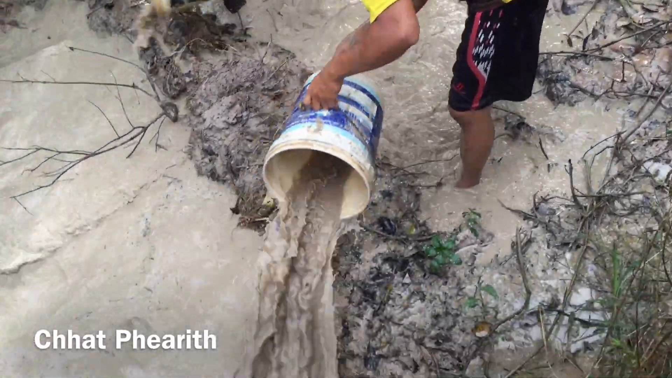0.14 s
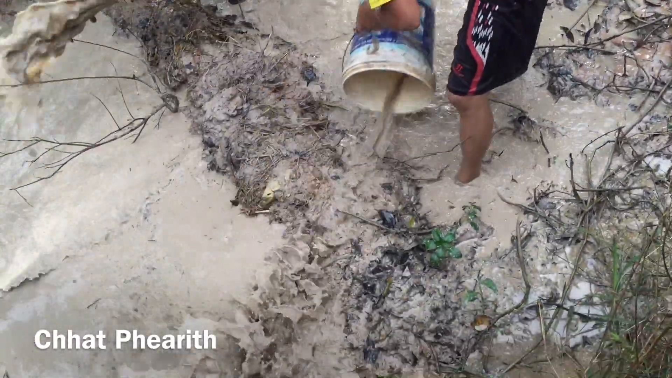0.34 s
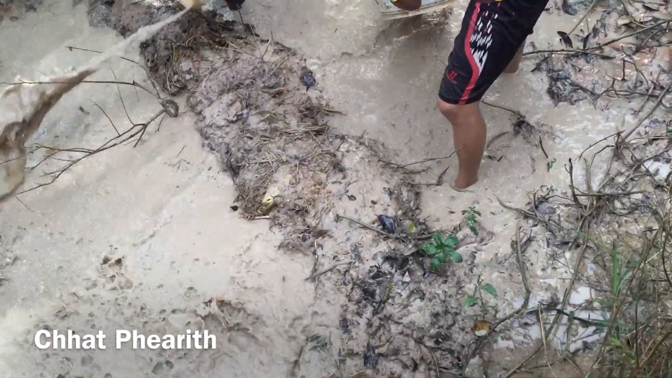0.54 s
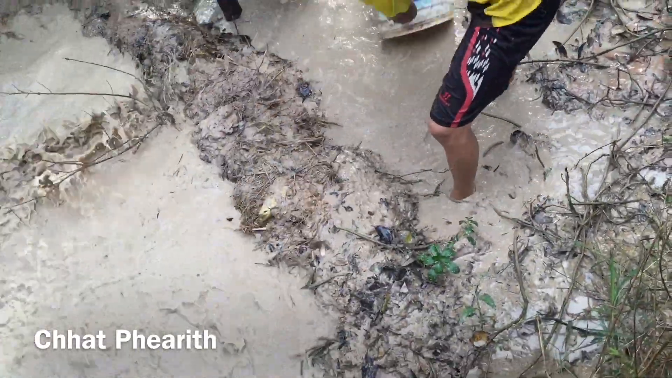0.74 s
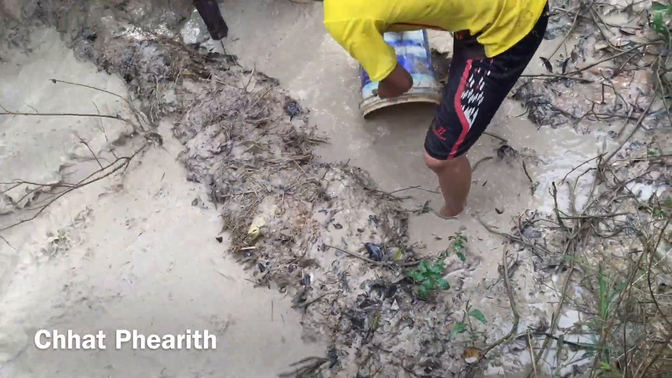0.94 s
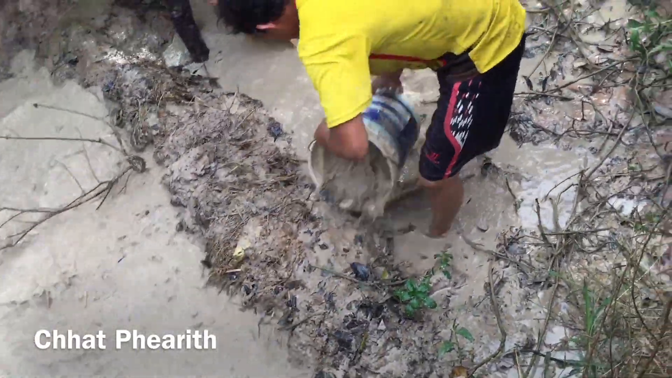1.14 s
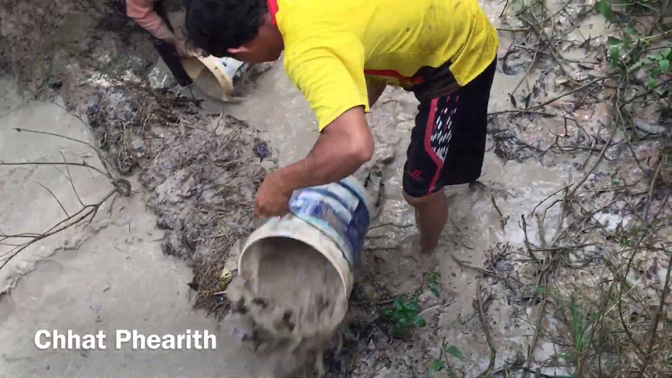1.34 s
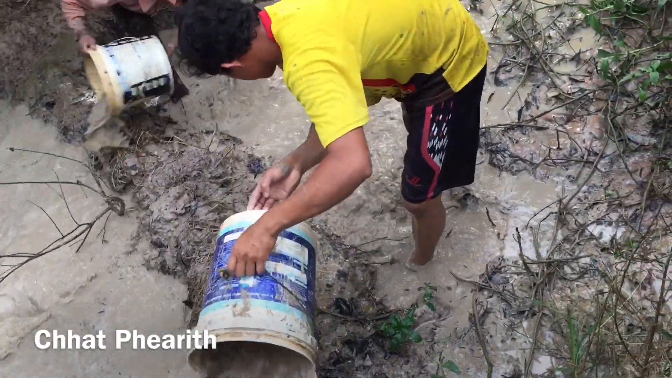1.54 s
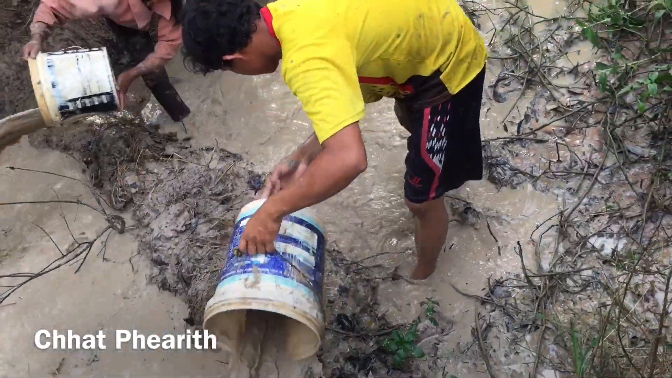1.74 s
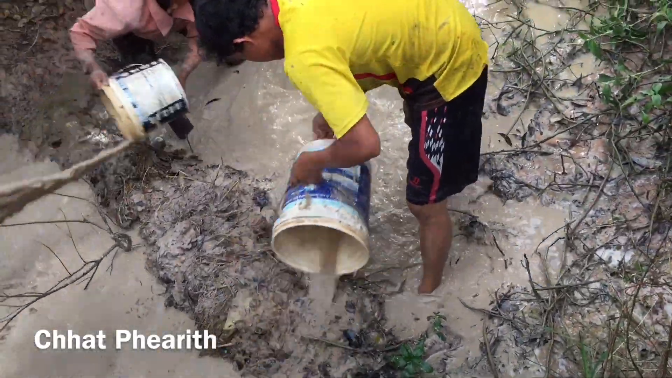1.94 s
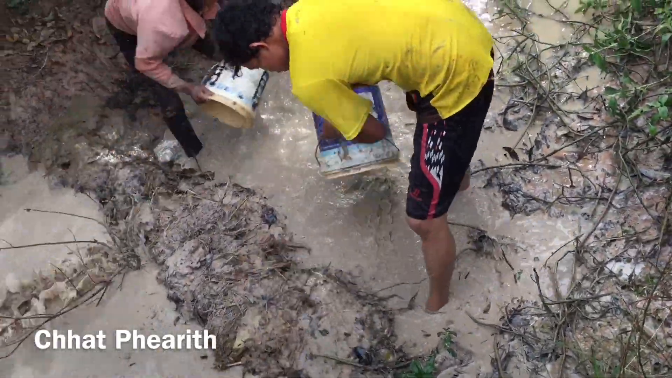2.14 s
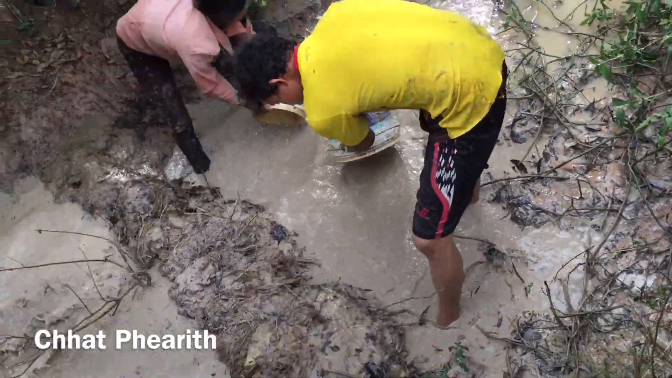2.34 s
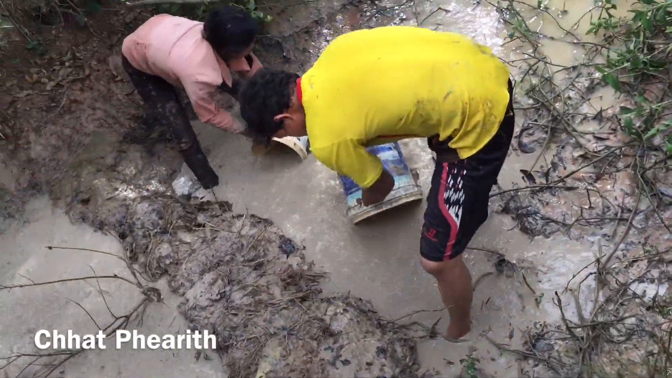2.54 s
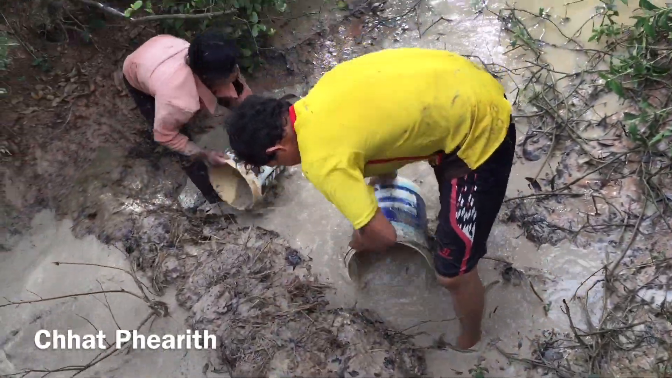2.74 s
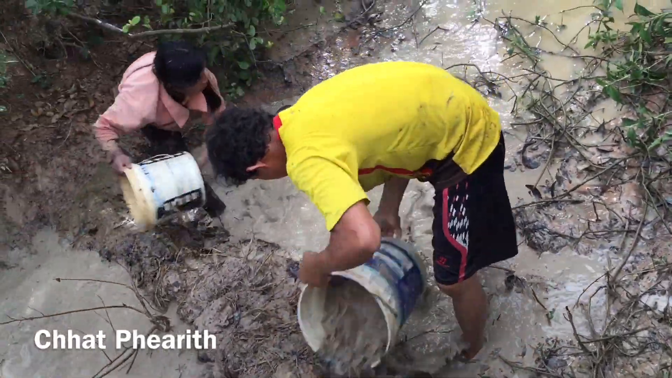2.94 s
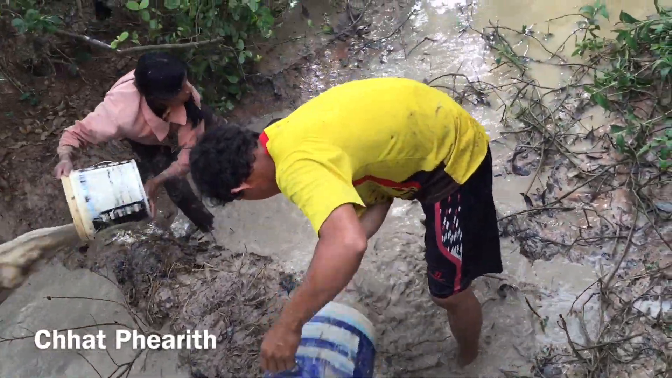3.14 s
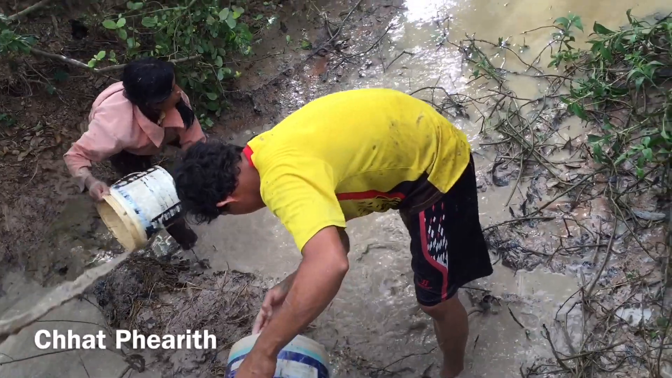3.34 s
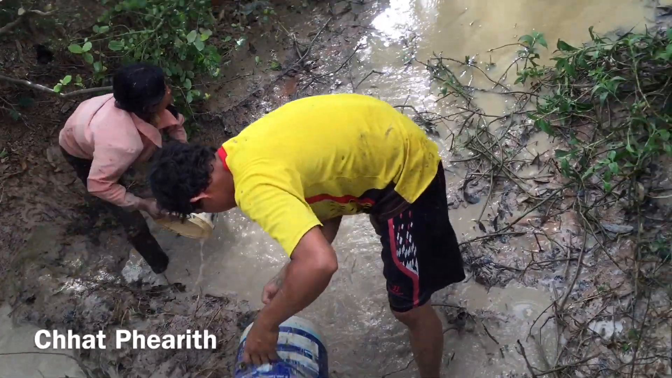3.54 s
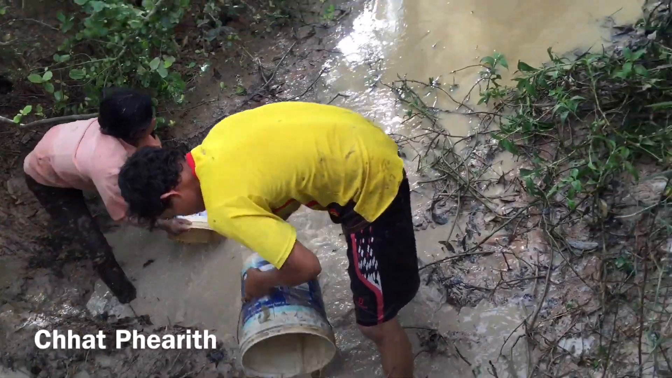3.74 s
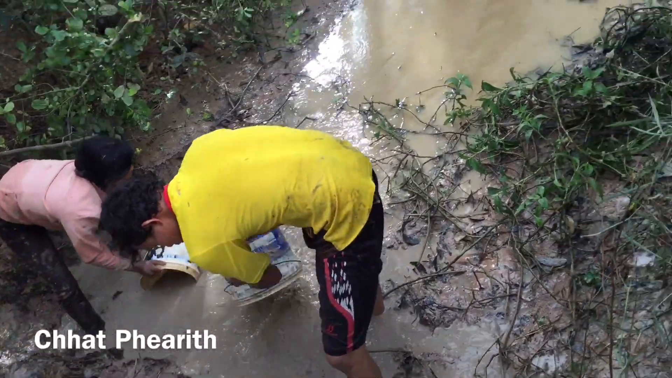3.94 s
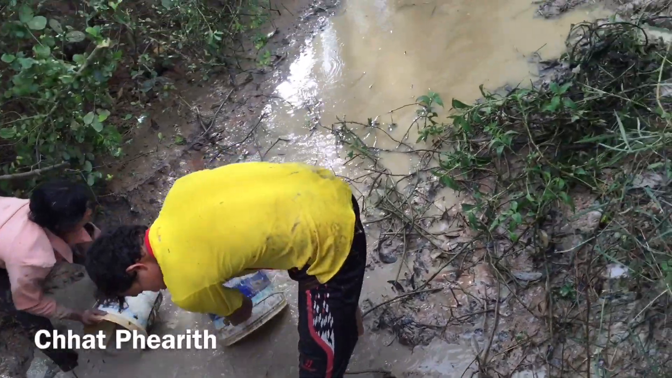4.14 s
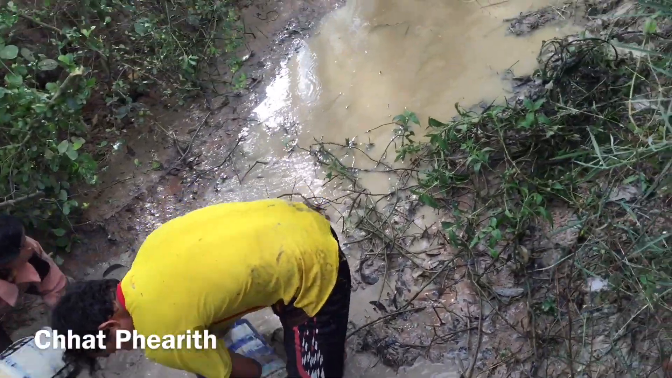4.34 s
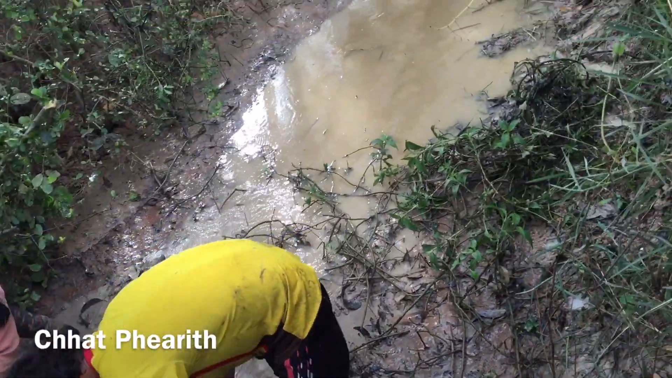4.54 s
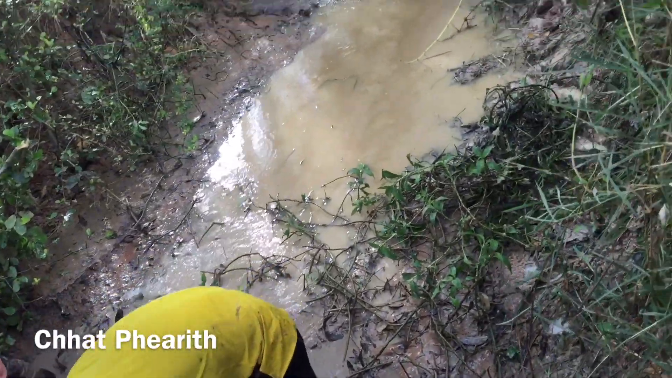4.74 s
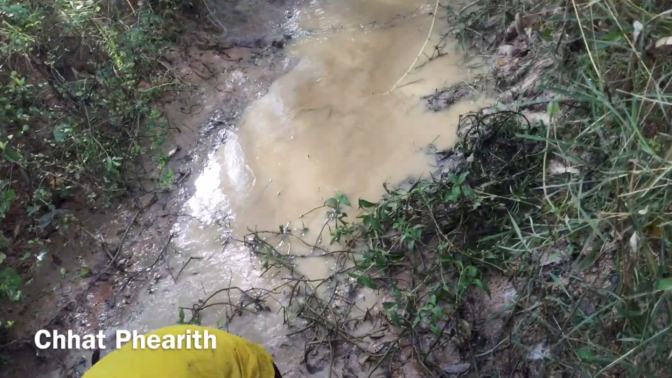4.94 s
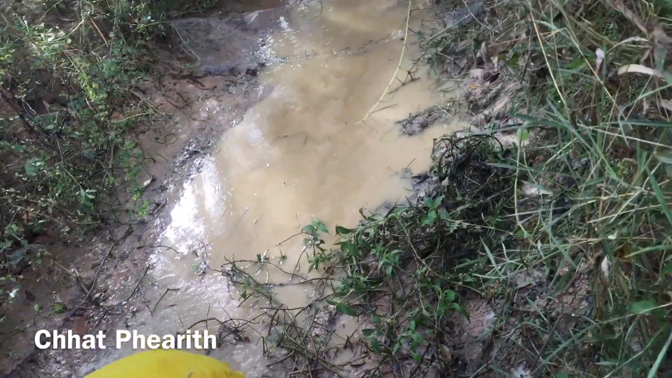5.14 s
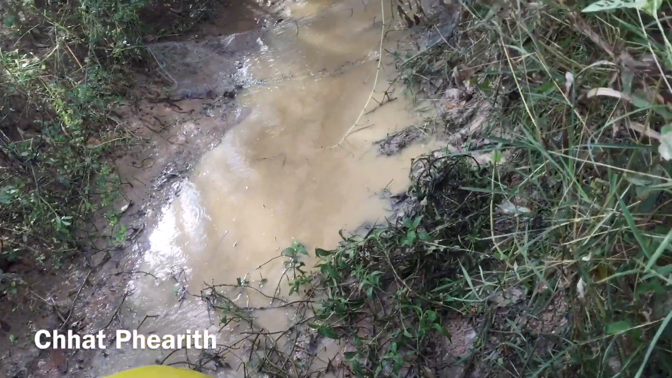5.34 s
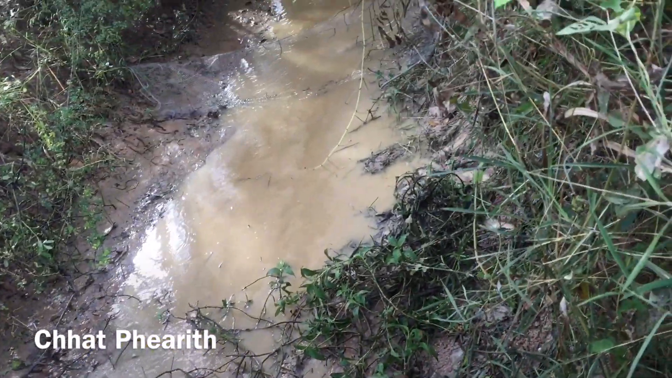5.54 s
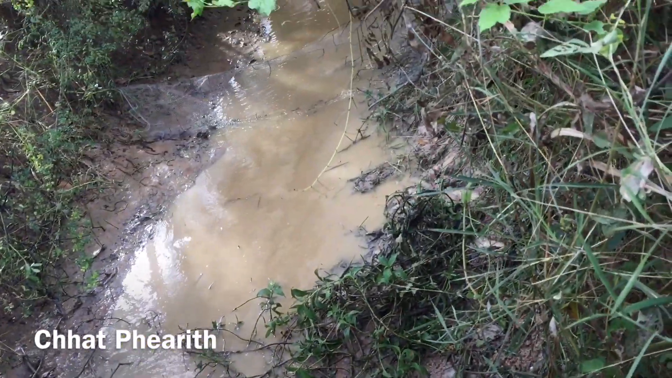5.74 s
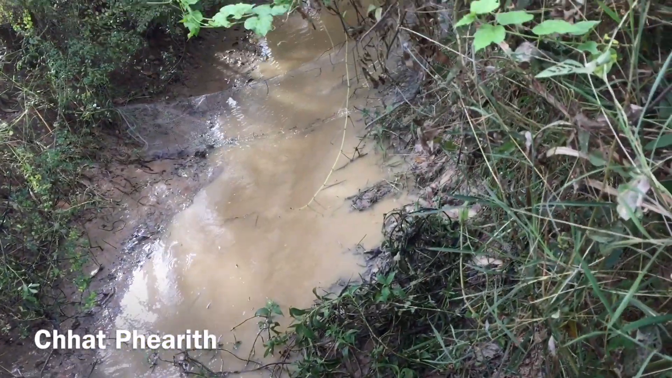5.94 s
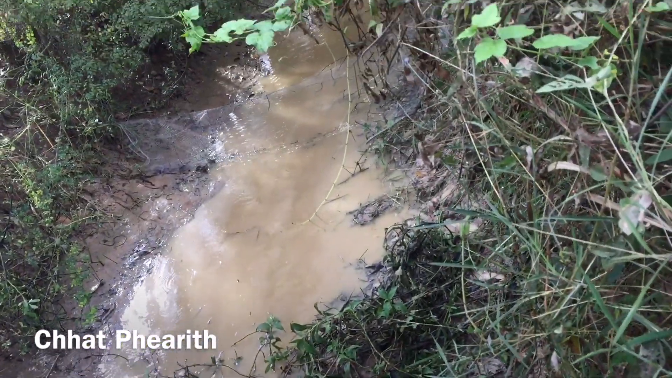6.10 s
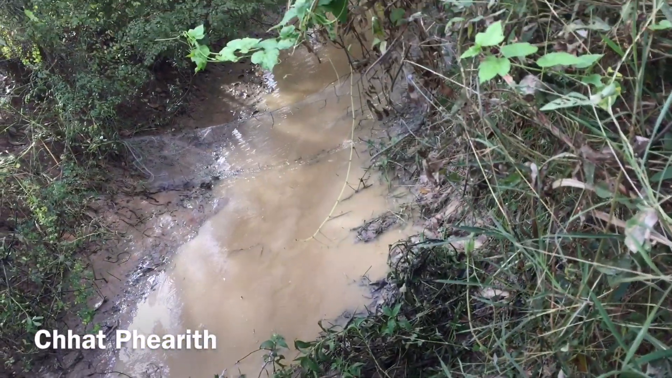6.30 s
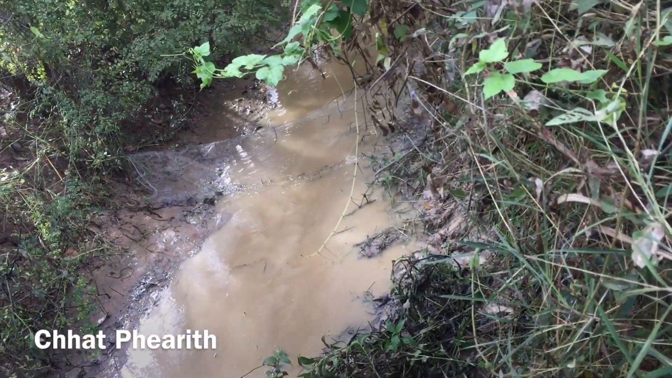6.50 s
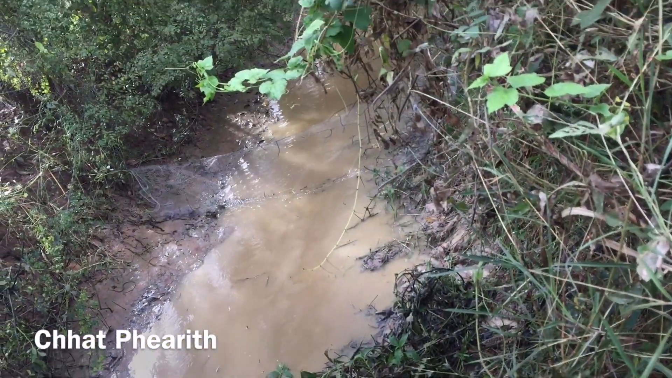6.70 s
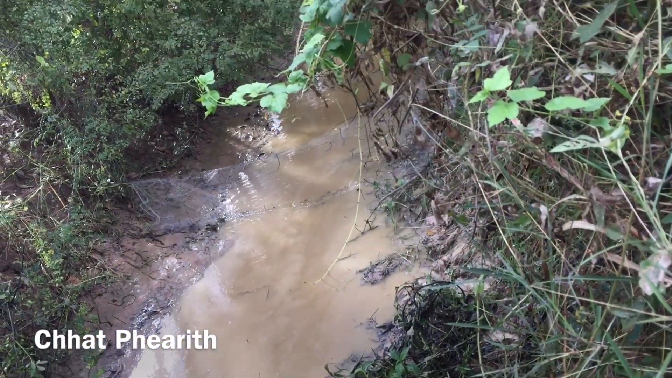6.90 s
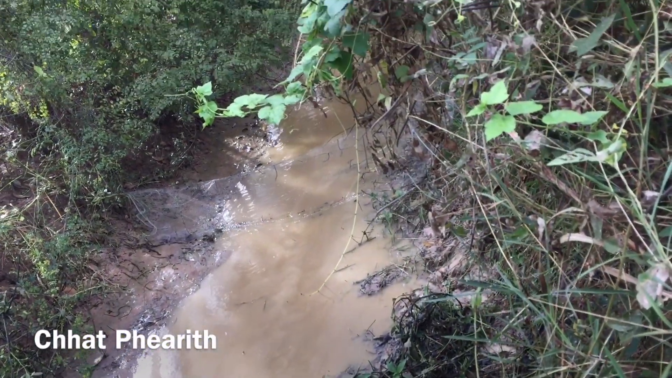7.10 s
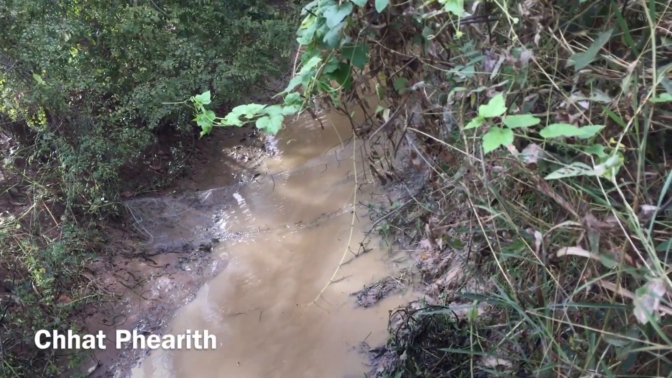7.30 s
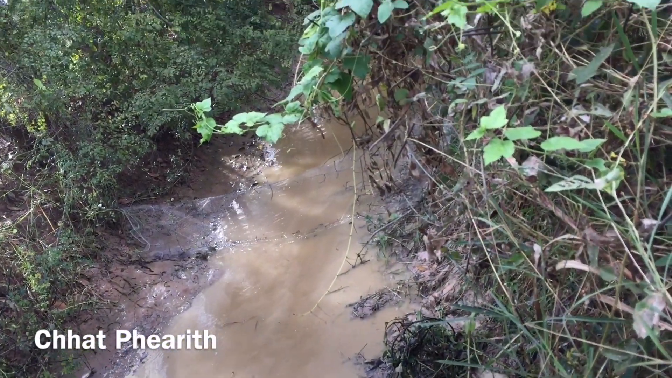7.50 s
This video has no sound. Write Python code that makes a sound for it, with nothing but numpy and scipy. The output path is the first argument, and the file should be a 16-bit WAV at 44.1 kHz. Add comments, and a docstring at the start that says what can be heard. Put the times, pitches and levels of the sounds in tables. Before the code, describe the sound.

Right at the start, a big bucket of muddy water empties over a bank, close by: a wet smack, a soft thud, churning bubbles, then spray thinning to a trickle. The same heavy pour returns at about 1.7, 3.4 and 5.1 seconds. A smaller bucket flings lighter splashes at about 0.7, 2.1 and 3.6 seconds, and more water patters down around 5.5. Between pours, buckets scoop and legs wade, making uneven sloshes, short slaps and hollow gulps of trapped air. Around 6 seconds the water grows quiet, then a last sharp splash lands at 6.5. From there until about 7.5 seconds the ditch settles in small laps, drips and plinks. The place is outdoors, with a very short echo from nearby mud walls and a faint, wavering low drone far away throughout.

```python
"""Two people bail a muddy ditch with plastic buckets. At once the big bucket goes over the bank: a smack,
a thud, large bubbles churning, then spray that thins to a trickle. It pours three more times, about
every 1.7 s; in between, scoops slosh and gulp air and the small bucket flings its water. A last throw
lands at 6.5 s and the ditch settles in small laps and plinks. Throughout, close mud walls answer
briefly over a faint, far drone."""
import sys
import numpy as np
from scipy import signal
from scipy.fft import rfft, irfft, next_fast_len
from scipy.io import wavfile
from scipy.ndimage import map_coordinates

SR = 44100
rng = np.random.default_rng(int(sys.argv[2]) if len(sys.argv) > 2 else 0)


def waveform_to_disk(signal):
    """Save audio, clipped to [-1, 1], as 16-bit WAV at the path in sys.argv[1]."""
    frames = np.transpose(np.atleast_2d(signal))
    scaled = np.clip(frames, -1, 1) * 32767
    samples = np.round(scaled).astype(np.int16)
    wavfile.write(sys.argv[1], SR, samples)


N = 337806

# Levels in the tables are faders ahead of each layer's own trim; mist is set relative to the spray.
# The big bucket empties over the bank. Each row: first water in seconds, landing of the main mass
# in seconds, spray level in dB, churn level in dB, fade of the spray in dB per second.
POURS = [(0.07, .15, -31, -33, 22), (1.638, 1.79, -30.5, -32.5, 26.5), (3.4, 3.486, -30.5, -32.5, 31),
         (5.035, 5.16, -32, -32, 31)]
# Flung water comes down, mostly from the small bucket. Each row: heaviest moment in seconds,
# build-up in seconds, spray level in dB, churn level in dB, mist in dB.
THROWS = [(0.718, 0.054, -28.5, -34, -8), (2.137, 0.038, -29.5, -42, -4.5), (2.203, 0.1, -34.5, -33, -6),
          (3.579, 0.023, -26.5, -31.5, -7), (3.791, 0.16, -37.5, -37, -6), (5.545, 0.24, -37, -36.5, -7.5),
          (6.543, 0.011, -29, -36.5, -7)]
# Buckets scoop, legs wade, the ditch settles. Each row: start in seconds, length in seconds,
# spray level in dB, churn level in dB, mist in dB.
SLOSHES = [(-.02, .09, -48.5, -50.5, -3.5), (0.581, 0.017, -35, -54, -1.5), (0.785, 0.3, -46, -43.5, -9),
           (0.915, 0.17, -44.5, -45, -4), (1.106, 0.23, -42, -44.5, -6), (1.372, 0.11, -44, -47.5, -12.5),
           (1.487, 0.094, -45, -48, -3.5), (2.302, 0.12, -44, -50.5, -9.5), (2.499, 0.023, -45, -45, -4),
           (2.596, 0.11, -45.5, -51, -7), (2.676, 0.071, -42, -41.5, -6), (2.793, 0.18, -42.5, -46.5, -7.5),
           (2.913, 0.2, -43.5, -52, -7), (3.148, 0.08, -49.5, -49.5, -8.5),
           (3.289, 0.023, -47.5, -48, -12.5), (4.033, 0.035, -68, -48, -11), (4.158, 0.18, -48, -50, -12),
           (4.379, 0.12, -43, -42, -6), (4.494, 0.12, -42.5, -42.5, -9), (4.626, 0.21, -48, -54.5, -4.5),
           (4.848, 0.073, -49.5, -49, -9.5), (4.977, 0.068, -47, -55, 1.5), (5.738, .12, -45.5, -53, -7.5),
           (5.898, 0.029, -47.5, -55, -26), (6.05, 0.047, -54, -65, -29), (6.163, 0.32, -64.5, -85, -18),
           (6.379, .09, -57.5, -77, -1), (6.465, 0.019, -44.5, -69, 2), (6.547, 0.13, -47, -47, -11.5),
           (6.69, 0.22, -49, -66, -8.5), (6.964, 0.0083, -50.5, -58, -4.5), (7.054, 0.29, -61, -61, -13),
           (7.307, 0.097, -53.5, -62.5, -13), (7.428, 0.033, -57, -61.5, -9)]
# The largest air pockets trapped by a bucket or by falling water. Each row: start in seconds,
# peak level in dB, starting pitch in Hz, time to fall 60 dB in seconds.
GULPS = [(.101, -21, 310, 0.016), (.138, -22, 205, 0.056), (.149, -15, 330, 0.046), (.146, -15, 676, 0.015),
         (.166, -24, 272, 0.046), (.177, -27.5, 165, 0.065), (.2, -26.5, 850, .028), (.284, -26, 677, .022),
         (.716, -25.5, 850, 0.026), (.982, -16, 195, 0.08), (1.007, -33, 1600, 0.031),
         (1.037, -33, 780, .054), (1.752, -17.5, 290, 0.027), (1.777, -22, 287, 0.045),
         (1.799, -25.5, 190, 0.017), (1.847, -24, 660, 0.039), (2.131, -30, 344, .04),
         (2.27, -40, 344, 0.09), (2.606, -41, 589, 0.11), (2.678, -24.5, 293, 0.023),
         (2.695, -35, 197, .08), (2.728, -29.5, 169, 0.019), (3.478, -18, 737, 0.025),
         (3.487, -22.5, 314, 0.056), (3.575, -16, 650, 0.013), (4.198, -29, 837, 0.024),
         (4.406, -31, 194, 0.097), (4.414, -33, 128, .078), (4.43, -37, 737, 0.13), (4.504, -34, 286, .12),
         (5.163, -26.5, 293, 0.051), (6.187, -53.5, 1066, 0.069), (6.361, -48.5, 570, .035),
         (6.536, -32, 280, 0.031), (6.584, -29.5, 863, .029), (6.897, -47, 255, 0.058),
         (6.989, -45, 1720, .035), (7.099, -45.5, 1650, .028), (7.317, -40, 1630, .04),
         (7.327, -43, 341, 0.13), (7.386, -42.5, 332, 0.074), (7.483, -45, 1470, 0.058),
         (7.48, -58.5, 318, 0.44)]
# The loudest slaps of water and wet mud. Each row: start in seconds, level in dB,
# centre frequency in Hz, time to fall 60 dB in seconds.
SLAPS = [(.123, -20, 3230, 0.027), (.325, -23, 2040, .009), (.342, -30, 8100, .01), (.612, -27, 3000, .07),
         (.716, -23, 2540, .033), (.962, -26, 2000, 0.019), (1.007, -24.5, 2000, .022),
         (1.038, -29.5, 1900, .09), (1.413, -32, 2060, 0.027), (1.455, -32, 3400, 0.01),
         (1.554, -28.5, 2080, 0.019), (1.684, -27.5, 2320, .1), (1.749, -21, 1850, 0.12),
         (2.163, -24, 2500, 0.029), (2.604, -35, 1210, 0.03), (2.677, -26, 2580, .035),
         (2.806, -32.5, 1760, 0.017), (3.005, -26, 2430, 0.019), (3.244, -34, 1450, .02),
         (3.478, -19, 735, .03), (3.488, -23, 3000, .05), (3.58, -26, 2930, 0.014), (4.193, -34, 1060, 0.1),
         (4.222, -36, 2500, 0.026), (4.3, -37.5, 1800, 0.022), (4.414, -32.5, 1300, 0.063),
         (4.456, -28, 5380, 0.008), (4.539, -30, 1600, 0.03), (4.711, -30.5, 2900, 0.011),
         (4.928, -34.5, 1670, 0.048), (5.065, -23.5, 2860, .05), (5.112, -21, 1520, .045),
         (5.185, -25.5, 1460, 0.025), (5.3, -24, 2170, .012), (5.925, -35, 1410, 0.061),
         (5.938, -38.5, 1960, 0.061), (6.407, -37.5, 3020, 0.039), (6.485, -26, 2740, .02),
         (6.494, -29, 1330, 0.025), (6.534, -20.5, 1110, 0.035), (6.541, -20.5, 2440, 0.028),
         (6.541, -29.5, 7360, .039), (6.593, -23.5, 2380, 0.031), (6.773, -36.5, 1370, 0.046),
         (6.985, -38, 1090, 0.022), (7.079, -46, 900, 0.05), (7.126, -45.5, 2530, 0.019),
         (7.333, -44, 1000, 0.11), (7.325, -43, 1790, .12), (7.448, -49.5, 3160, 0.036)]
# Tone curves for the spray, the large bubbles and the drone. Each row: frequency in Hz, gain in dB.
SPRAY_EQ = [(530, -9.5), (900, -0.5), (1110, -1), (2040, 3.5), (2390, 0.5), (3000, 1.5), (4360, -3),
            (4960, -10.5), (5470, -8.5), (6790, -12.5), (9500, -16), (12400, -110.5)]
CHURN_EQ = [(70, -25), (130, -6), (200, -5), (330, 0), (420, 0), (510, -2), (660, 2), (850, -1.5),
            (1080, -12.5), (1500, -1.5), (2500, -52)]
DRONE_EQ = [(20, -15), (30, -7.5), (40, -32.5), (58, 1.5), (70, 5.5), (86, -0.5), (110, -6.5), (138, 2.5),
            (175, -17.5), (260, -29.5), (600, -48), (2500, -33), (9500, -47)]
# The tone curve of the trickle. Each row: frequency in Hz, gain in dB.
TRICKLE_EQ = [(700, 4.5), (2100, 3.5), (4200, -1.5)]
# The tail of the mud walls. Each row: frequency in Hz, time to fall 60 dB in seconds.
WALL_DECAY = [(150, 0.13), (1000, 0.22), (9000, 0.1)]

DB_PER_NEPER = 20 / np.log(10)


def pours(break_s=0.0088, mass_s=0.088, fresh_s=0.06):
    """Each pour breaks in, swells until the main mass lands, then drains: churn, spray, mist in dB."""
    t = np.arange(N) / SR
    for first, lands, spray_db, churn_db, drain in POURS:
        age = np.maximum(t - first, 0)
        opening_db = -DB_PER_NEPER * np.logaddexp(0, (first - t) / break_s)
        lead = np.clip((lands - t) / (lands - first), 0, 1)  # the first water is the weaker
        mass = np.exp(-((t - lands) / mass_s) ** 2)
        drained_db = drain * np.maximum(t - lands, 0)
        yield (churn_db + opening_db - 11 * lead + 4 * mass - 1.33 * drained_db,  # big bubbles die first
               spray_db + opening_db - 3 * lead + 0.5 * mass - drained_db,
               -7 + 3.5 * np.exp(-age / fresh_s))  # a fresh sheet of water breaks up finer


def throws(fall_s=0.035):
    """Flung water builds as its arc comes down, then stops short: churn, spray, mist in dB."""
    t = np.arange(N) / SR
    for peak, build_s, spray_db, churn_db, mist_db in THROWS:
        shape_db = DB_PER_NEPER * np.minimum((t - peak) / build_s, (peak - t) / fall_s)
        yield churn_db + shape_db, spray_db + shape_db, mist_db


def sloshes(rise_s=0.027, sag_db_per_s=9, fall_s=0.051):
    """A slosh rises fast, sags in uneven wavelets and settles: churn, spray, mist in dB."""
    t = np.arange(N) / SR
    wavelets_db = 1.35 * wobble(45)
    for start, length, spray_db, churn_db, mist_db in SLOSHES:
        age = np.maximum(t - start, 0)
        rise_db = 20 * np.log10(np.minimum(age / rise_s, 1) + 1e-6)
        settling_db = DB_PER_NEPER * np.maximum(age - length, 0) / fall_s
        shape_db = rise_db + wavelets_db - sag_db_per_s * age - settling_db
        yield churn_db + shape_db, spray_db + shape_db, mist_db


def water_levels(seep_db=-76.5, seep_mist_db=-5.5):
    """All moving water adds in power over the bank's steady seep: churn, spray, mist envelopes in dB."""
    power = lambda db: amp(np.maximum(db, -200)) ** 2
    low, high, fine = power(seep_db), power(seep_db), power(seep_db + seep_mist_db)
    for source in (pours, throws, sloshes):
        for churn_db, spray_db, mist_db in source():
            low += power(churn_db)
            high += power(spray_db)
            fine += power(spray_db + mist_db)
    return 10 * np.log10([low, high, fine / high])


def churn(level_db):
    """Falling water folds in air: large bubbles over a dull rush, in lumps."""
    cloud = bubbles(count=4500, lo_hz=151, hi_hz=1149, cycles=16.1, spread_db=0.5, rise=0.11)
    rush = amp(-0.5) * rng.standard_normal(N)
    body = unit(equalised(cloud + rush, CHURN_EQ))
    choke_db = 0.13 * np.maximum(level_db + 28.5, 0)  # the heaviest fall loses air to a few big gulps
    return amp(level_db - 3 - choke_db + 1.7 * wobble(45)) * body


def spray(level_db, mist_db, crossover_hz=4800):
    """Drops burst on mud and water; the finest ones make the mist on top."""
    drops = bubbles(count=24000, lo_hz=865, hi_hz=9170, cycles=5.3, spread_db=-1.5, rise=0.1)
    fizz = bubbles(count=6000, lo_hz=896, hi_hz=6920, cycles=61, spread_db=3.5, rise=0.42)
    cloud = equalised(drops + amp(-5) * fizz + rng.standard_normal(N), SPRAY_EQ)
    coarse = filtered(cloud, lambda hz: 1 / (1 + (hz / crossover_hz) ** 12))
    mist = amp(mist_db) * unit(cloud - coarse)
    clump_db = np.interp(level_db, [-52, -32], [1.5, 0.7])  # a dribble is clumpy, a gush runs together
    return amp(level_db - 3 + clump_db * wobble(110)) * (unit(coarse) + mist)


def gulps(swell_cycles=0.96, glide=0.096, flutter_db=2.5):
    """A trapped air pocket swells, rings and glides up as it dies, while its wall flutters."""
    track, t = np.zeros(N), np.arange(SR // 3) / SR
    for start, db, hz, t60 in GULPS:
        shape = (1 - np.exp(-(t * hz / swell_cycles) ** 2)) * decay(t, t60)
        tone = np.sin(2 * np.pi * hz * t * (1 + glide * t / t60))
        add(track, start, amp(db) * shape / shape.max() * tone)
    return track * amp(flutter_db * wobble(160))


def impacts(spray_db, lap_count=60, lap_ceiling_db=-27):
    """The slap cues, as in SLAPS: the loud hits, each pour's smack and thud, and small chance laps."""
    smacks = [(first, -30, 3700, 0.053) for first, *_ in POURS]  # the first water meets the mud
    thuds = [(lands, -30, 143, 0.18) for _, lands, *_ in POURS]  # the mass hits the ground
    laps = []
    for when, size, pitch in rng.random((lap_count, 3)):
        db = min(spray_db[int(when * N)], lap_ceiling_db) - 1.5 + 6 * (2 * size - 1)
        laps.append((when * N / SR, db, 1900 * 2 ** (2 * pitch - 1), 0.09))
    return SLAPS + smacks + thuds + laps


def slaps(cues, width=0.96, attack_s=0.0015, trim_db=-7):
    """A sheet of water hits flat: a short burst in the broad resonance of the hollow it makes."""
    track, t = np.zeros(N), np.arange(SR // 4) / SR
    for start, db, centre, t60 in cues:
        damping = lambda hz: 1j * hz * centre * width
        hollow = lambda hz: (damping(hz) / (centre ** 2 - hz ** 2 + damping(hz))) ** 2
        burst = unit(filtered(rng.standard_normal(len(t)), hollow))
        shape = (1 - np.exp(-t / attack_s)) * decay(t, t60)
        add(track, start, amp(db + trim_db) * burst * shape / shape.max())
    return track


def trickle(spray_db):
    """Small plinks of water running back; they fade more slowly than the spray, so they come forward."""
    plinks = bubbles(count=1100, lo_hz=750, hi_hz=4000, cycles=44, spread_db=2.7, rise=0.1)
    return amp(0.69 * spray_db - 24) * unit(equalised(plinks, TRICKLE_EQ))


def spatter(spray_db):
    """Stray drops tick on wet mud, a few dozen a second."""
    ticks = bubbles(count=450, lo_hz=1500, hi_hz=8050, cycles=11, spread_db=14, rise=0.1)
    return amp(1.21 * spray_db - 10) * unit(equalised(ticks, SPRAY_EQ))


def bank_bounce(x, delay_s=0.002373, gain_db=-12.5, dull_hz=6000):
    """The sound plus its first, duller reflection off the nearest bank."""
    echo = lambda hz: amp(gain_db) * np.exp(-2j * np.pi * hz * delay_s) / (1 + 1j * hz / dull_hz)
    return filtered(x, lambda hz: 1 + echo(hz))


def mud_walls(x):
    """The mud walls scatter a short tail, longest in the mids."""
    hz, t, noise = signal.stft(rng.standard_normal(SR // 4), SR, nperseg=256)
    _, tail = signal.istft(noise * decay(t, along(WALL_DECAY, hz)[:, None]), SR, nperseg=256)
    delayed = np.pad(x, (SR // 200, 0))  # 5 ms pre-delay
    return signal.fftconvolve(delayed, tail / np.linalg.norm(tail))[:N]


def drone():
    """The bed: a faint, wavering low drone and the hush of open air."""
    level_db = -57.5 + 1.8 * wobble(3.5)
    return amp(level_db) * unit(equalised(rng.standard_normal(N), DRONE_EQ))


def bubbles(count, lo_hz, hi_hz, cycles, spread_db, rise):
    """A cloud of bubbles, rms 1: each rings for some cycles and rises in pitch as it nears the surface."""
    when, pitch, size, life = rng.random((count, 4)).T[:, :, None]
    hz = lo_hz + (hi_hz - lo_hz) * pitch
    t60 = cycles * (0.5 + life) / hz
    t = np.arange(min(int(cycles / lo_hz * SR), 4000000 // count)) / SR
    gain = np.sqrt(hz) * amp(-spread_db * np.log(0.02 + size))
    tone = np.sin(2 * np.pi * hz * t * (1 + rise * t / t60 / 2))
    shape = (1 - np.exp(-2 * hz * t)) * decay(t, t60)
    at = (when * N).astype(int) + np.arange(len(t))
    return unit(np.bincount(at.ravel(), (gain * tone * shape).ravel(), N)[:N])


def amp(db):
    """Decibels to gain."""
    return 10 ** (np.asarray(db) / 20)


def unit(x):
    """Scale to rms 1."""
    return x / np.sqrt(np.mean(x ** 2) + 1e-20)


def decay(t, t60):
    """A fade that falls 60 dB in t60 seconds."""
    return np.exp(-np.log(1000) * t / t60)


def wobble(rate):
    """A smooth random curve, rate knots a second."""
    knots = rng.standard_normal(int(N * rate / SR) + 4)
    return map_coordinates(knots, [np.arange(N) * rate / SR])


def along(points, hz):
    """Read a curve of (Hz, value) points on a log frequency axis."""
    point_hz, values = np.transpose(points)
    return np.interp(np.log(hz + 1), np.log(point_hz + 1), values)


def filtered(x, response):
    """Pass x through a frequency response."""
    size = next_fast_len(len(x) + 8192)
    return irfft(rfft(x, size) * response(np.fft.rfftfreq(size, 1 / SR)), size)[:len(x)]


def equalised(x, curve):
    """Colour x with a tone curve."""
    return filtered(x, lambda hz: amp(along(curve, hz)))


def add(track, start, sound):
    """Mix a sound into the track at start seconds."""
    part = track[max(round(start * SR), 0):][:len(sound)]
    part += sound[:len(part)]


def scene():
    """The mono mix: all the water in the ditch, its walls and the far drone."""
    churn_db, spray_db, mist_db = water_levels()
    flow = churn(churn_db) + spray(spray_db, mist_db) + trickle(spray_db) + spatter(spray_db)
    water = flow + gulps() + bank_bounce(slaps(impacts(spray_db)))
    return (water + amp(-13.5) * mud_walls(water) + drone())[None]


def record(dry, top_hz=9800):
    """A brick-wall high cut on the whole mix."""
    return filtered(dry[0], lambda hz: hz < top_hz)[None]


dry = scene()
out = record(dry)
waveform_to_disk(out)
```